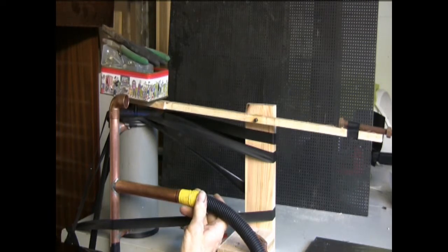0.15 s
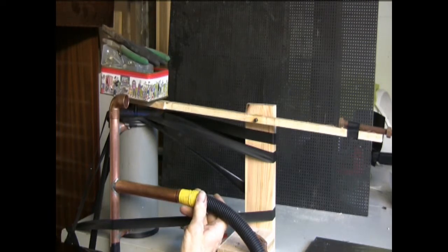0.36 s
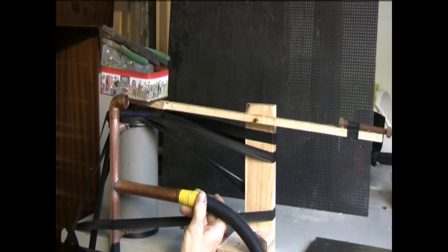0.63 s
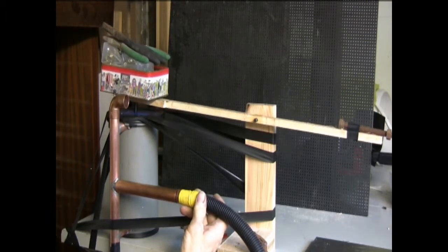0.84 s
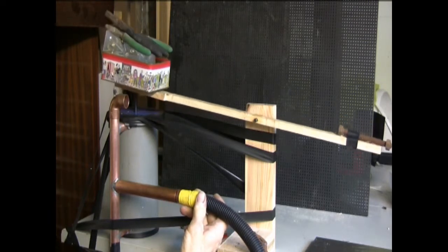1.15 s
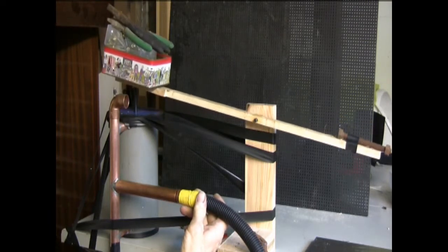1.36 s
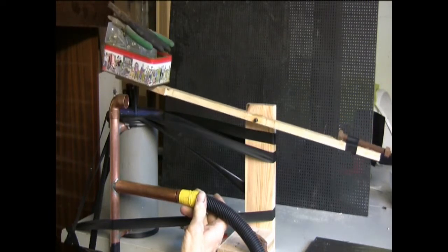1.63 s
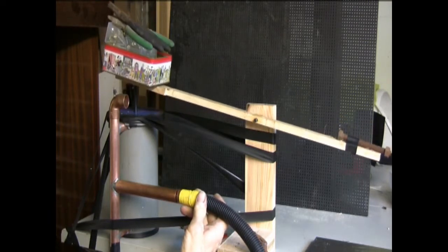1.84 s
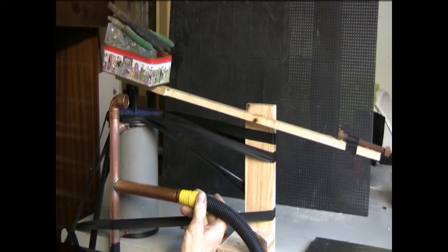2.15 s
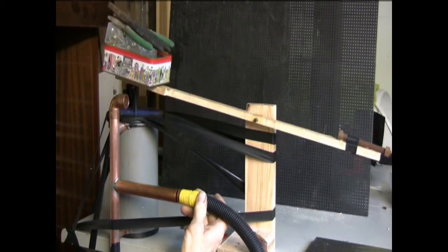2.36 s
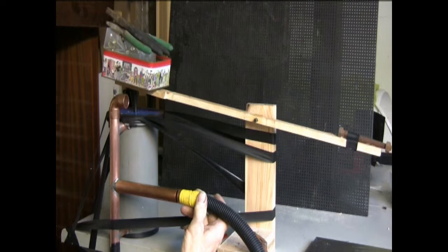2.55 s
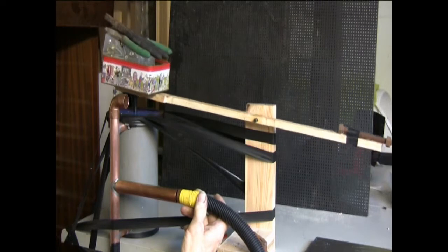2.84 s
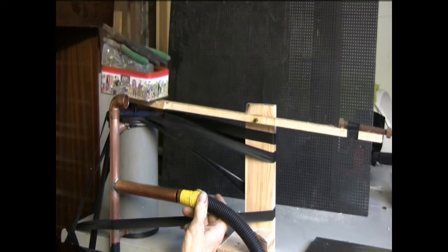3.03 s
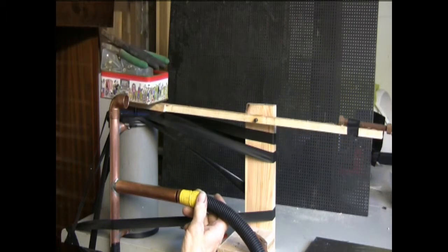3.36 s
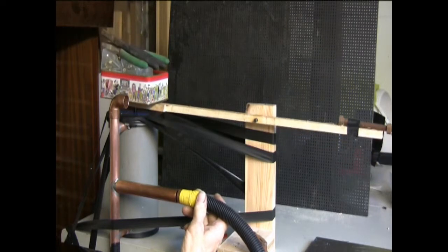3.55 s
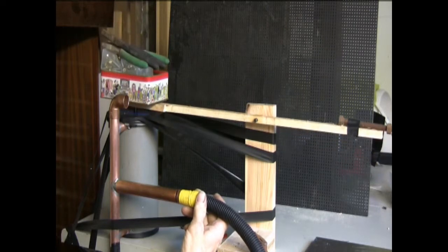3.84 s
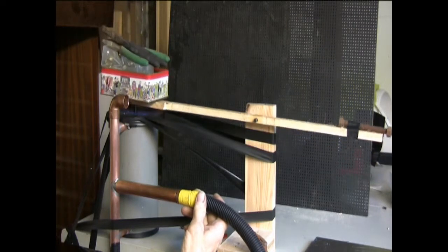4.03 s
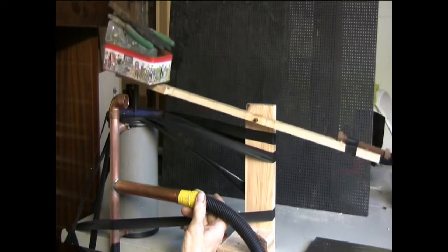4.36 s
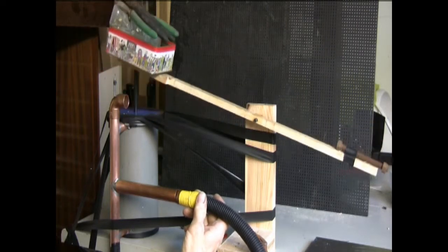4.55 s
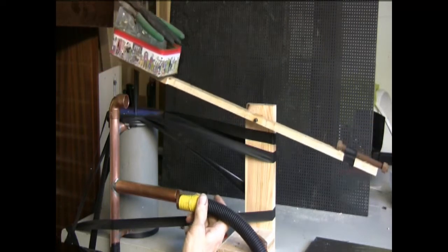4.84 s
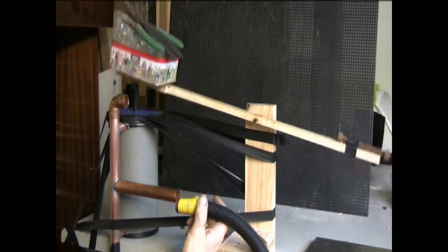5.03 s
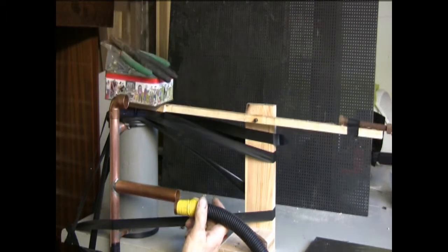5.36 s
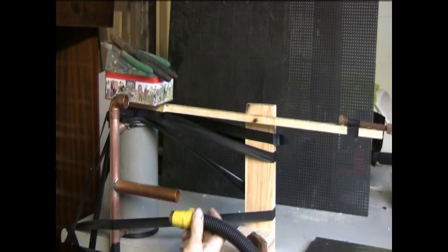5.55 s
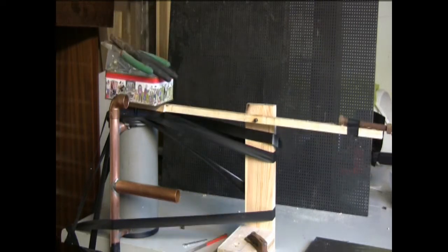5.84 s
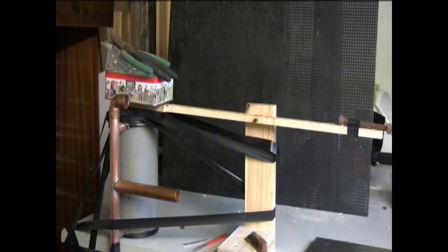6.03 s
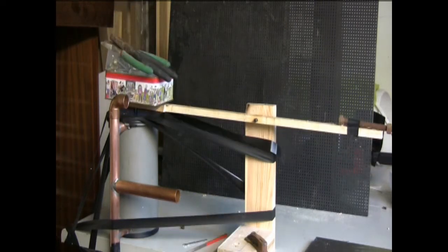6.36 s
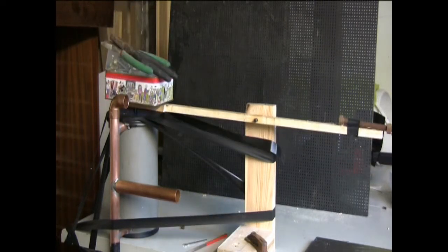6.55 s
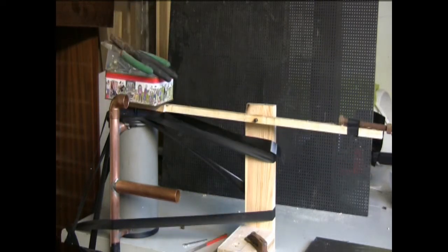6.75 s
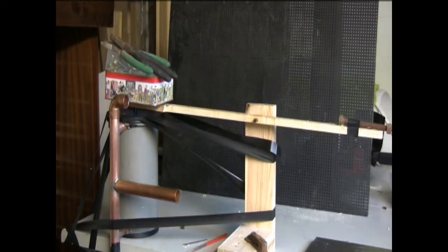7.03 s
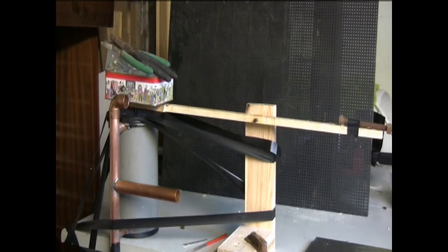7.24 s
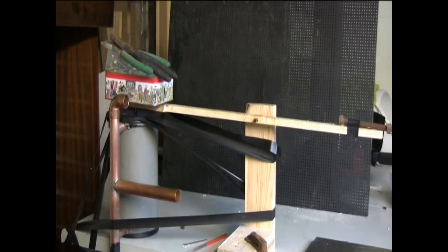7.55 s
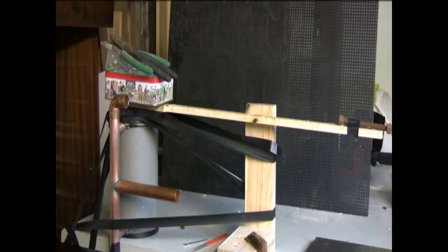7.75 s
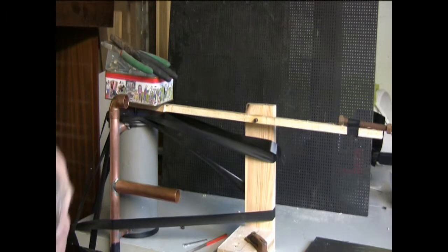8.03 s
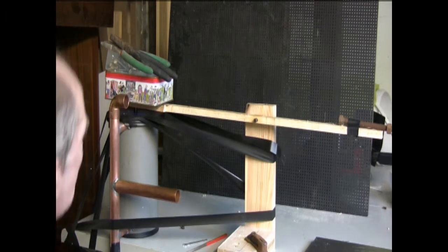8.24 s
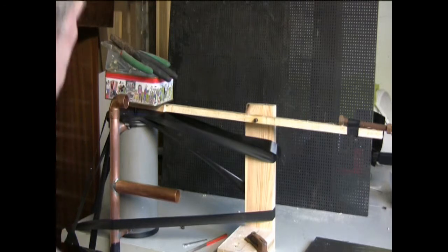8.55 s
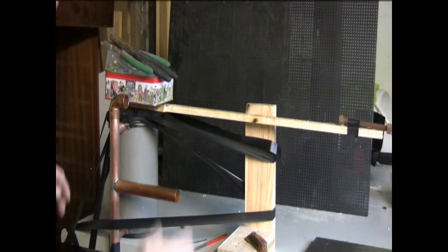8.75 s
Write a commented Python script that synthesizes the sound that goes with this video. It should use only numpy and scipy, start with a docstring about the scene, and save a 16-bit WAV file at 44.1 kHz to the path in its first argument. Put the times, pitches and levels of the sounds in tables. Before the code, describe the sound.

Close up in a small workshop, a vacuum cleaner sucks at a copper pipe with a loud, bright, steady rush of air, faintly singing from the hose ribs. A hollow pipe roar around 500 Hz colours it, swelling strongest at about 2.4 and 3.1 seconds, then easing after 4. From 4.7 to 5.0 the pipe gulps in rapid, uneven, hooting puffs with light wooden ticks. At 5.25 a wooden lever and box drop with a sharp crack and dense clatter until 5.4, with skidding scrapes, dull bench thuds and tiny descending squeaks. The freed hose leaves a brighter plain rush; soft bumps come at 6.0 and 6.3. The motor is switched off at 6.1: thin high whines slide steadily down, the airy singing sinks, and the rush, held loud at first, loses treble and fades, with a low hum emerging. Faint dull knocks come at 8.2 and 8.35.

```python
"""A vacuum cleaner sucks through a ribbed hose at a copper pipe, working a wooden lever rig in a workshop.
Turbulent air rings the ducts, eddies make the pipe roar and puff as the rig opens, and the hose ribs sing.
The lever drops, clatters, skids and squeaks by modal excitation; dull bumps shake the bench.
The hose is pulled off and the motor switched off: drag and friction sink its whine and the rush dulls.
A gain control holds the overall level until it runs out of gain, so the rush stays loud at first."""
import sys
import numpy as np
from scipy import signal
from scipy.fft import rfft, irfft, next_fast_len
from scipy.io import wavfile

SR = 44100
rng = np.random.default_rng(int(sys.argv[2]) if len(sys.argv) > 2 else 0)


def int16_out(signal):
    """Quantize to a 16-bit WAV file."""
    q = np.round(np.clip(np.atleast_2d(signal).T, -1, 1) * 32767)
    wavfile.write(sys.argv[1], SR, q.astype(np.int16))


N = 392035
T = np.arange(N) / SR  # time [s]
F = np.arange(N // 2 + 1) * SR / N + 1e-3  # frequency [Hz], kept above zero for logarithms
TOP_HZ = 12600  # upper limit of the tones and of the whole sound
# All levels are those of the sources, ahead of the gain control.

# Turbulence spectrum of the rush: (frequency [Hz], relative density [dB per Hz])
RUSH_SPECTRUM = [(30, -40), (70, -49), (140, -31.5), (220, -9.5), (400, -12.5), (900, -9), (1350, -6.5),
                 (2100, 1), (2600, -1.5), (4500, -8.5), (7500, -11), (10000, -13), (11500, -17),
                 (12400, -30)]
# Resonances of housing and ducts: (frequency [Hz], Gaussian width [Hz], boost [dB])
DUCT_RESONANCES = [(445, 41, 6.5), (594, 110, 4.5), (1045, 31, 5), (1196, 72, 2.5), (1447, 100, 2),
                   (1520, 17, 6.5), (1620, 96, 0), (1668, 33, 7), (1758, 52, 4.5), (1930, 51, 1.5),
                   (2006, 38, 4), (2141, 33, 4.5), (2182, 16, 5.5), (2269, 36, 5.5), (2870, 27, 1),
                   (2860, 42, 0), (2970, 46, 4.5), (3305, 214, 3.5), (3480, 20, 5), (3670, 5.5, 9),
                   (4220, 200, 2), (5210, 440, 4), (8840, 210, 1.5)]
# Bands of the rush: (centre [Hz], weight of the treble change [1], weight of the bass change [1])
RUSH_BANDS = [(300, 0.59, 1), (1100, 0.53, 0.76), (1550, 0.25, 0.64), (2300, 0.048, 0.27),
              (2370, 0.58, 0.34), (3100, 0.3, 0), (3450, 0.094, 0), (5260, 0.41, 0), (6300, 1.37, 0.6),
              (8800, 0.87, 0.3), (12000, 0.95, 0)]
# Level at full speed, and its fall for each octave that the motor slows
RUSH_DB, RUSH_FALL_DB_PER_OCTAVE = -23, 16.5
# Bass boost at full speed, and its growth, which makes the bass fall less
BASS_DB, BASS_DB_PER_OCTAVE = 1, 5
# Treble gained with the hose free, and lost over the first part of the run-down
FREE_TREBLE_DB, TREBLE_LOSS_DB, TREBLE_LOSS_OCTAVES = 1.5, 9, 0.7


def rush(flutter_db=0.65, sway_db=0.48, treble_pan_db=0.5, bass_pan_db=0.06, duct_pan_db=-0.8):
    """Resonant filtering of turbulence: the flow rings the ducts, and its treble dies first as it slackens."""
    octaves = slowed()
    level = RUSH_DB - RUSH_FALL_DB_PER_OCTAVE * octaves
    bass = BASS_DB + BASS_DB_PER_OCTAVE * octaves
    treble = FREE_TREBLE_DB * freed() - TREBLE_LOSS_DB * (1 - bell(octaves, 0, TREBLE_LOSS_OCTAVES))

    boost_db = sum(db * np.exp(-2 * ((F - hz) / width) ** 2) for hz, width, db in DUCT_RESONANCES)
    gain = colour(RUSH_SPECTRUM) * undb(boost_db)
    gain = gain * reflections() ** np.clip(F / 4000, 0, 1)  # small surfaces throw back only short waves
    spectrum = rfft(air(gain, (1450, 2500)))

    log_centres = np.log([row[0] for row in RUSH_BANDS])
    sides = np.array([[1], [-1]])
    out = 0
    for (_, high, low), pick in zip(RUSH_BANDS, np.eye(len(RUSH_BANDS))):
        # neighbouring bands overlap as triangles on a logarithmic frequency axis
        band = irfft(spectrum * np.interp(np.log(F), log_centres, pick), N)
        pan = duct_pan_db + high * (treble_pan_db - duct_pan_db) + low * (bass_pan_db - duct_pan_db)
        change_db = high * treble + low * bass + flutter_db * walk(20)
        out = out + band * undb(pan * sides) * undb(change_db)
    return out * undb(level + sway_db * walk(4.8))


# Roar at the pipe mouth as the lever lifts and sinks: (time [s], level [dB])
ROAR_LEVEL = [(0, -40), (1.35, -36.5), (2.35, -28.5), (2.7, -32.5), (3.1, -27), (3.6, -33.5), (3.9, -30),
              (4.2, -42), (4.55, -48), (4.7, -34), (4.88, -28), (5.05, -34.5), (5.25, -32.5), (5.5, -77)]
# How far the rig is open: (time [s], share [1])
RIG_OPENING = [(0, 0), (4.3, 0.41), (4.7, 0.5), (5.1, 0.4), (5.3, 0)]
# Pipe resonances, two colours blended by the opening share:
# (frequency [Hz], nominal width [Hz], gain at share 0 [dB], gain at share 1 [dB])
PIPE_RESONANCES = [(495.3, 15.5, 10.5, -7), (549, 24, 9, -21), (642, 39, 5, 0.5), (1042, 50, -6, -0.5)]


def pipe(flutter_db=1.5, spill_db=-19):
    """Pipe resonance: eddies at the mouth excite the air column, whose colour shifts as the rig opens."""
    level, opening = curve(ROAR_LEVEL), curve(RIG_OPENING)
    # broad splutter without bass
    spill = undb(spill_db) * resonance(1200, 600) * F ** 2 / (F ** 2 + 250 ** 2)
    narrow = air(spill + sum(undb(db) * resonance(hz, width) for hz, width, db, _ in PIPE_RESONANCES))
    wide = air(spill + sum(undb(db) * resonance(hz, width) for hz, width, _, db in PIPE_RESONANCES))
    blend = np.sqrt(1 - opening) * narrow + np.sqrt(opening) * wide
    return blend * undb(level + flutter_db * walk(34))


# Puffs of the open pipe:
# (time [s], half length [s], low note [dB], middle note [dB], high note [dB])
PIPE_PUFFS = [(4.692, .008, -27, -42, -38), (4.713, .014, -22.5, -40, -30), (4.745, .012, -34, -38, -29),
              (4.774, .014, -17.5, -30, -31), (4.805, .013, -20, -26, -24), (4.84, .014, -25.5, -40, -32),
              (4.876, .019, -21, -20, -29), (4.932, .015, -21.5, -40, -35), (4.981, .018, -20.5, -36, -44),
              (5.016, .013, -23, -34, -23.5)]
# Colour of their splutter: (frequency [Hz], relative density [dB per Hz])
SPLUTTER_SPECTRUM = [(150, -30), (260, 2), (400, -3), (900, -4), (1350, 0), (1800, -5), (3500, -20),
                     (8000, -45)]


def hoot(splutter_db=-26.5):
    """Intermittent excitation: the open pipe gulps air in uneven puffs that sound three of its resonances."""
    s, length, *levels = np.transpose(PIPE_PUFFS)[:, :, None]
    puffs = bell(T, s, length)
    notes = PIPE_RESONANCES[0][0], PIPE_RESONANCES[2][0], PIPE_RESONANCES[3][0]
    out = air(colour(SPLUTTER_SPECTRUM)) * undb(splutter_db) * puffs.sum(axis=0)
    for hz, db in zip(notes, levels):
        envelope = (puffs * undb(db)).sum(axis=0)
        out = out + envelope * tone(np.full(N, hz), 0, waver=.012, fade_db=.7)
    return out


# Airy resonances that swell and fade:
# (time [s], half length [s], frequency [Hz], nominal width [Hz], level [dB])
AIR_SWELLS = [(3.25, 0.61, 117, 22, -53), (6.672, 0.4, 155.2, 30, -57), (7.19, 0.25, 2100, 300, -38.5),
              (6.75, 0.3, 5140, 500, -42), (6.795, .025, 820, 40, -40), (7.19, 0.093, 610, 87, -44.5)]


def swells():
    """Transient resonance: each mode of the air path rises out of the rush and sinks back."""
    return sum(air(resonance(hz, width)) * undb(db) * bell(T, s, length)
               for s, length, hz, width, db in AIR_SWELLS)


# The hose comes off the pipe: middle and length of the pull
PULL_S, PULL_LENGTH_S = 4.78, .4


def freed():
    """Linear transition: how far the hose is off the pipe, 0-1."""
    return np.clip((T - PULL_S) / PULL_LENGTH_S + .5, 0, 1)


# Standing waves: spacing, width, and the share they have sagged at half motor speed
HOSE_SPACING_HZ, HOSE_WIDTH_HZ, HOSE_SAG = 315, 55, .05
# Rate at which air passes the ribs, on the pipe and free; its power law with speed; its spread as a share
RIB_HZ, RIB_FREE_HZ, RIB_POWER, RIB_SPREAD = 5700, 6380, .64, .08
# Nominal drive level on the pipe and free, and its fall as the motor slows
SING_DB, SING_FREE_DB, SING_FALL_DB_PER_OCTAVE = -40.5, -32.5, 30
# The hose sings most readily around one rib rate
SING_BEST_HZ, SING_BEST_WIDTH_HZ, SING_BEST_DB = 5150, 550, 9.5


def hose(flicker_db=2.0):
    """Flow-excited resonance: air passing the ribs drives the standing waves that lie near the rib rate."""
    rib_hz = (RIB_HZ + (RIB_FREE_HZ - RIB_HZ) * freed()) * speed() ** RIB_POWER
    level = SING_DB + (SING_FREE_DB - SING_DB) * freed() - SING_FALL_DB_PER_OCTAVE * slowed()
    level = level + SING_BEST_DB * bell(rib_hz, SING_BEST_HZ, SING_BEST_WIDTH_HZ)
    clock = np.cumsum(1 - HOSE_SAG * slowed() ** 2) / SR  # the notes sag as the flow slackens
    count = int(T[-1] * HOSE_WIDTH_HZ) + 2
    knots = np.linspace(0, T[-1], count)
    out = np.zeros((2, N))
    for mode in range(8, 25):
        hz = mode * HOSE_SPACING_HZ
        drive = undb(flicker_db * walk(8)) / (1 + ((hz / rib_hz - 1) / RIB_SPREAD) ** 2)
        # each standing wave swells and fades at random, independently in the two channels
        for channel, (a, b) in enumerate(rng.standard_normal((2, 2, count))):
            swell = np.interp(T, knots, a + 1j * b)
            out[channel] += drive * (swell * np.exp(2j * np.pi * hz * clock)).real
    return out * undb(level)


# Shaft turns a second until the switch-off; then air drag (at full speed) and friction slow it
RUN_HZ, OFF_S, DRAG_PER_S, FRICTION_PER_S = 541, 6.135, .4, .235


def speed():
    """Rotational decay: share of full speed, steady and then coasting against quadratic drag and friction."""
    ratio = DRAG_PER_S / FRICTION_PER_S
    return 1 / ((1 + ratio) * np.exp(FRICTION_PER_S * np.maximum(T - OFF_S, 0)) - ratio)


def slowed():
    """Logarithmic speed scale: octaves by which the motor has slowed."""
    return -np.log2(speed())


# How well the housing lets the commutator whine out: (frequency [Hz], gain [dB])
HOUSING_GAIN = [(3450, -6), (3750, -3), (4200, -15), (5900, -16), (6400, -11), (7000, -9), (7600, -15),
                (8200, -4), (8700, 2), (9800, -1), (11500, 1), (12600, -4)]
# Shaft hum, louder as the shaft passes the resonance of its mounts
HUM_DB, HUM_FALL_DB_PER_OCTAVE = -63.5, 12.5
MOUNT_HZ, MOUNT_WIDTH_HZ, MOUNT_DB = 170, 104, 22
# Whine of the commutator bars and its octave ahead of the housing, and its fade-in after the switch-off
BAR_DB, OCTAVE_DB, BAR_FALL_DB_PER_OCTAVE, BAR_ONSET_S = -40.3, -54, 12, .07


def motor():
    """Rotational tones: the unbalanced shaft hums and, as it coasts, brushes whine over 22 commutator bars."""
    shaft = RUN_HZ * speed()
    bars = 22 * shaft
    coasting = np.clip((T - OFF_S) / BAR_ONSET_S, 0, 1)
    hum_db = HUM_DB - HUM_FALL_DB_PER_OCTAVE * slowed() + MOUNT_DB * bell(shaft, MOUNT_HZ, MOUNT_WIDTH_HZ)
    out = tone(shaft, hum_db, waver=.004, fade_db=2)
    for hz, db in (bars, BAR_DB), (2 * bars, OCTAVE_DB):
        level = db - BAR_FALL_DB_PER_OCTAVE * slowed() + np.interp(hz, *np.transpose(HOUSING_GAIN))
        out = out + coasting * tone(hz, level, waver=.004, fade_db=3)
    return out


# A thin second whine that sinks evenly after the switch-off; STRAND_DB sets its upper strand against it
WHINE_HZ, WHINE_SINK_HZ_PER_S = 10265, 1925
WHINE_DB, WHINE_FALL_DB_PER_OCTAVE, STRAND_DB = -50, 10, -7


def whine(ring_hz=5100, ring_width_hz=170, ring_db=11):
    """Swept resonance: two thin strands fade in as the motor slows, sink and swell at a housing resonance."""
    hz = WHINE_HZ - WHINE_SINK_HZ_PER_S * np.maximum(T - OFF_S, 0)
    level = WHINE_DB - WHINE_FALL_DB_PER_OCTAVE * slowed() + ring_db * bell(hz, ring_hz, ring_width_hz)
    lower = tone(hz, level, waver=.004, fade_db=3)
    upper = tone(1.05 * hz, level + STRAND_DB, waver=.004, fade_db=4)
    return (lower + upper) * np.clip(slowed(), 0, 1) ** 2


# Modes of the wooden rig: (frequency [Hz], relative level [dB], decay time t60 [s])
RIG_MODES = [(265, -16, .07), (362, -15, .17), (458, -14, .12), (580, -7, .05), (770, -9, .12),
             (880, -5, .05), (1039, -7, .1), (1316, -6, .04), (1430, -10, .087), (1680, -6, .06),
             (2520, -9, .03)]
# Blows of the lever and its box:
# (time [s], direct peak [dB], nominal contact time [ms], frequency favoured by the spot struck [Hz])
LEVER_BLOWS = [(4.765, -17.5, .4, 1450), (4.8, -20, .3, 1050), (5.245, -14.5, .4, 580),
               (5.2485, -6, .05, 2300), (5.255, -8, .15, 880), (5.259, -10, .08, 1500),
               (5.267, -10, .1, 1300), (5.328, -9.5, .1, 1350), (5.337, -13, .1, 1400),
               (5.349, -14, .1, 1400), (5.361, -9.5, .18, 900), (5.37, -14, .2, 580),
               (5.392, -14, .15, 770)]


def clatter():
    """Modal excitation: the dropping lever and its box strike the modes of the wooden rig."""
    return knocks(LEVER_BLOWS, RIG_MODES, crack=5, room_db=-9, room_t60=.14)


# Skids of the box and lever: (time [s], half length [s], level [dB])
SKIDS = [(5.282, .026, -27.5), (5.352, .028, -24.5), (5.397, .012, -29), (6.79, .02, -38)]
CONTACTS_PER_S, SCRAPE_WIDTH_HZ = 1500, 110


def scrape():
    """Random impact excitation: the skidding box makes dense tiny contacts that excite the wood."""
    envelope = sum(undb(db) * bell(T, s, length) for s, length, db in SKIDS)
    contacts = (rng.random(N) < CONTACTS_PER_S / SR) * rng.standard_normal(N)
    wood = sum(undb(db) * resonance(hz, SCRAPE_WIDTH_HZ) for hz, db, _ in RIG_MODES)
    return envelope * unit(irfft(rfft(contacts) * wood, N))


# Squeaks of the settling lever: (time [s], half length [s], frequency [Hz], level [dB])
LEVER_SQUEAKS = [(5.343, .013, 1755, -21), (5.363, .01, 1620, -22.5), (5.397, .01, 1410, -18)]
SQUEAK_SINK_HZ_PER_S = 2000


def squeak():
    """Frictional slip tones: the settling lever rubs, each slip lower than the last and sinking a little."""
    out = 0
    for s, length, hz, db in LEVER_SQUEAKS:
        glide = hz - SQUEAK_SINK_HZ_PER_S * np.clip(T - s, -2 * length, 2 * length)
        out = out + bell(T, s, length) * tone(glide, db, waver=.008, fade_db=1)
    return out


# Modes of the bench: (frequency [Hz], relative level [dB], decay time t60 [s])
BENCH_MODES = [(112, -12, .2), (251, -5, .1), (325, 5, .06), (358, 0, .12), (395, 1, .04), (560, -1, .08),
               (1810, -14, .03)]
# Dull bumps on the bench:
# (time [s], direct peak [dB], nominal contact time [ms], frequency favoured by the spot struck [Hz])
BENCH_BUMPS = [(5.25, -27.5, 3, 115), (5.275, -19, 1.1, 380), (5.281, -15.5, 1.1, 380),
               (5.295, -21.5, 1.1, 380), (6.01, -28, 1.5, 300), (6.275, -23.5, 1.5, 300),
               (8.19, -29.3, 1.2, 350), (8.2, -36.5, .6, 560), (8.21, -43, 2.5, 115),
               (8.341, -39.5, 1.1, 400), (8.358, -40.5, 2.5, 250)]


def bumps():
    """Modal excitation: mostly longer contacts make the bench thud dully."""
    return knocks(BENCH_BUMPS, BENCH_MODES, crack=.7, room_db=-14, room_t60=.25)


# The spot struck favours the modes near one pitch: by how much, over what range
SPOT_DB, SPOT_OCTAVES = 10, .45


def knocks(blows, modes, crack, room_db, room_t60):
    """Modal synthesis: a force pulse of given contact time rings decaying modes, and the room adds a tail."""
    t = np.arange(SR // 2) / SR
    out = np.zeros((2, N + len(t)))
    hz, db, t60 = np.transpose(modes)[:, :, None]
    wood = signal.butter(2, [450, 2800], "band", fs=SR, output="sos")
    small_body = signal.butter(2, 110, "high", fs=SR, output="sos")
    for s, peak_db, contact_ms, spot_hz in blows:
        spot_db = SPOT_DB * bell(np.log2(hz / spot_hz), 0, SPOT_OCTAVES)
        strength = undb(db + spot_db + rng.standard_normal(db.shape))
        decay = np.exp(-np.log(1000) * t / t60)
        ring = np.sum(strength * np.cos(2 * np.pi * hz * t) * decay, axis=0)
        # many short-lived modes merge into a crack
        ring = ring + crack * signal.sosfilt(wood, rng.standard_normal(len(t))) * np.exp(-t / .008)
        push = t * np.exp(-4000 * t / max(contact_ms, .05))
        struck = signal.fftconvolve(ring, push)[:len(t)]
        hit = signal.sosfilt(small_body, struck)  # little bass is radiated
        tail = rng.standard_normal((2, len(t))) * np.exp(-np.log(1000) * t / room_t60)
        tail = tail / np.linalg.norm(tail[0])
        wet = signal.fftconvolve(tail, hit[None], axes=1)[:, :len(t)]
        start = int(s * SR)
        out[:, start:start + len(t)] += (hit + undb(room_db) * wet) * undb(peak_db) / np.abs(hit).max()
    return out[:, :N]


# Colour of buffeting and rumble: (frequency [Hz], relative density [dB per Hz])
BUFFET_SPECTRUM = [(25, -28), (60, -3), (85, -4.5), (125, -6), (160, 9), (260, -38), (600, -70)]
# Low buffeting of air at full speed, and the rumble of the workshop under it
BUFFET_DB, BUFFET_FALL_DB_PER_OCTAVE, RUMBLE_DB = -57.5, 10, -70


def buffet(wander_db=4):
    """Low-frequency turbulence: air buffets, its level wandering at random, over the steady workshop rumble."""
    level = BUFFET_DB - BUFFET_FALL_DB_PER_OCTAVE * slowed()
    buffeting = air(colour(BUFFET_SPECTRUM)) * undb(level + wander_db * walk(5.0))
    rumble = air(colour(BUFFET_SPECTRUM)) * undb(RUMBLE_DB)
    return buffeting + rumble


def reflections(count=20, latest_s=.012):
    """Comb interference: faint early echoes from bench, walls and boards ripple the spectrum."""
    delays = rng.uniform(0.000994, latest_s, count)
    response = np.zeros(N)
    response[0] = 1  # direct sound
    response[(delays * SR).astype(int) + 1] = undb(-26.5) * rng.choice([-1, 1], count)
    return np.abs(rfft(response))


# Stereo width of the air noise: (frequency [Hz], side relative to mid [dB])
STEREO_WIDTH = [(60, -5), (110, -3.5), (200, -9), (360, -11), (650, -11.5), (1190, -11.5), (2150, -13.5),
                (3910, -8), (7100, -5.5), (12900, 0.5)]


def air(gain, band=None):
    """Mid-side decorrelation: coloured stereo turbulence, its mid signal of rms 1 within the band."""
    mid, side = rfft(rng.standard_normal((2, N))) * gain
    inside = 1 if band is None else (F > band[0]) & (F < band[1])
    side = side * colour(STEREO_WIDTH) * np.array([[1], [-1]])
    return irfft(mid + side, N) / np.std(irfft(mid * inside, N))


def tone(hz, db, waver, fade_db):
    """Phase integration: a gliding sine of nominal rms level that wavers and fades, partly apart by channel."""
    phase = 2 * np.pi * np.cumsum(hz * (1 + waver * walk(64.9))) / SR
    fading = fade_db * (.8 * walk(20) + .6 * np.array([walk(20), walk(20)]))
    return np.sqrt(2) * np.sin(phase) * (hz < TOP_HZ) * undb(db + fading)


def resonance(hz, width):
    """Resonance curve: gain of one peak with broad, slowly falling skirts."""
    return 1 / (1 + ((F - hz) / (0.63 * width)) ** 2)


def walk(rate):
    """Low-pass filtered noise: slow random variation of rms 1, up to about the given rate [Hz]."""
    size = next_fast_len(N)
    hz = np.arange(size // 2 + 1) * SR / size
    return unit(irfft(rfft(rng.standard_normal(size)) / (1 + (hz / rate) ** 4), size)[:N])


def colour(points):
    """Spectral envelope: gain at every frequency from (frequency [Hz], level [dB]) points."""
    hz, db = np.transpose(points)
    return undb(np.interp(np.log(F), np.log(hz), db))


def curve(table):
    """Linear interpolation: a (time, value) table joined by straight lines."""
    return np.interp(T, *np.transpose(table))


def bell(x, centre, width):
    """Gaussian envelope: a smooth hump of height 1, falling to 1/e at the width."""
    return np.exp(-((x - centre) / width) ** 2)


def unit(x):
    """Power normalisation: scale to rms 1."""
    return x / np.sqrt(np.mean(x ** 2))


def undb(db):
    """Logarithmic level: decibels to amplitude gain."""
    return 10 ** (np.asarray(db) / 20)


def scene():
    """Superposition: air, motor, rig and bench add linearly."""
    flow = rush() + pipe() + hoot() + swells() + hose()
    machine = motor() + whine()
    rig = clatter() + scrape() + squeak()
    return flow + machine + rig + bumps() + buffet()


# Gain control: level held, most gain, averaging time
HELD_DB, MOST_GAIN_DB, GAIN_TIME_S = -18.5, 15, 0.042


def record(dry):
    """Automatic gain control: averaged power sets a limited gain; a low-pass then cuts the top."""
    power = np.mean(dry ** 2, axis=0)
    settled = power[:SR // 2].mean()  # the average starts from the power of the first half second
    keep = np.exp(-1 / (GAIN_TIME_S * SR))
    heard = settled + signal.lfilter([1 - keep], [1, -keep], power - settled)
    gain = np.minimum(undb(HELD_DB) / np.sqrt(heard), undb(MOST_GAIN_DB))
    top_cut = signal.ellip(10, .2, 80, TOP_HZ, fs=SR, output="sos")
    return signal.sosfilt(top_cut, dry * gain)


dry = scene()
out = record(dry)
int16_out(out)
```